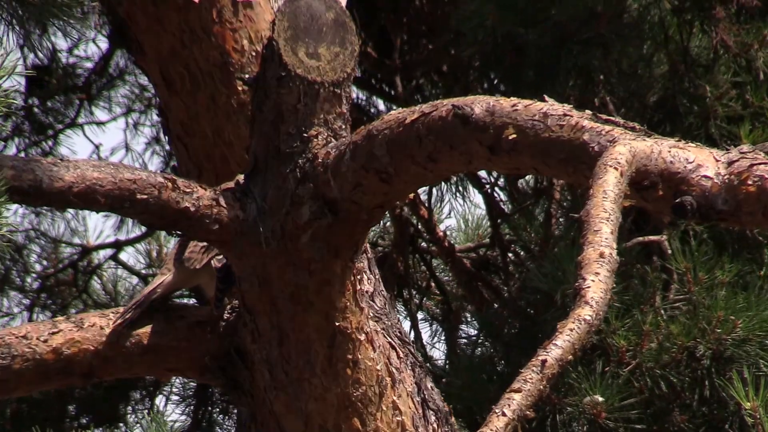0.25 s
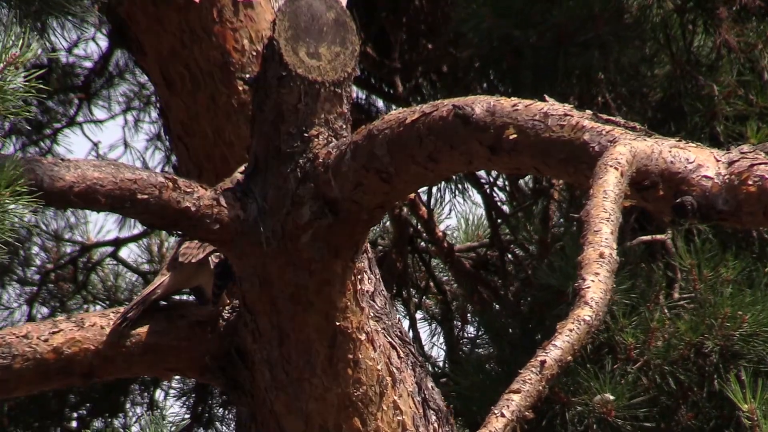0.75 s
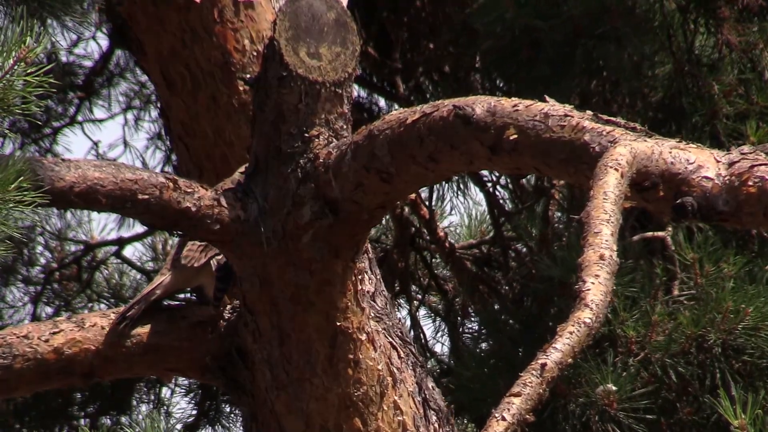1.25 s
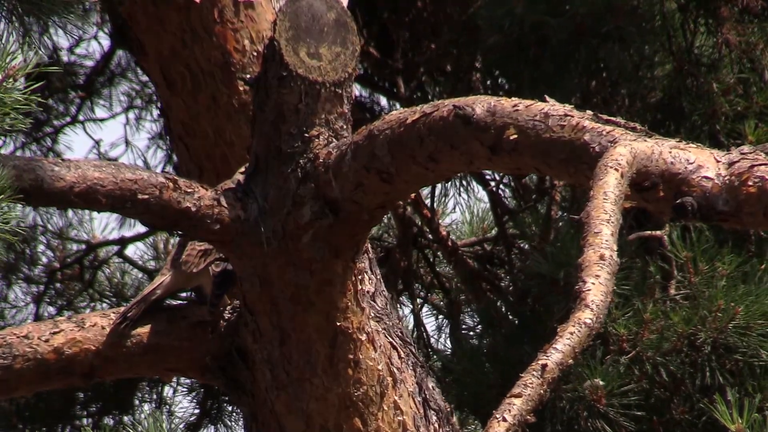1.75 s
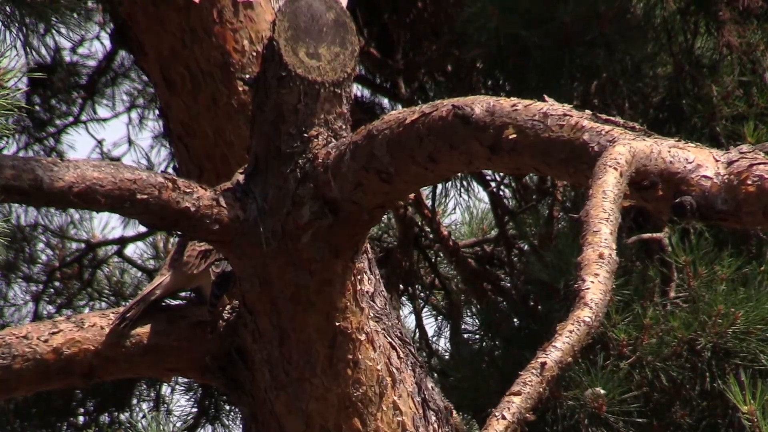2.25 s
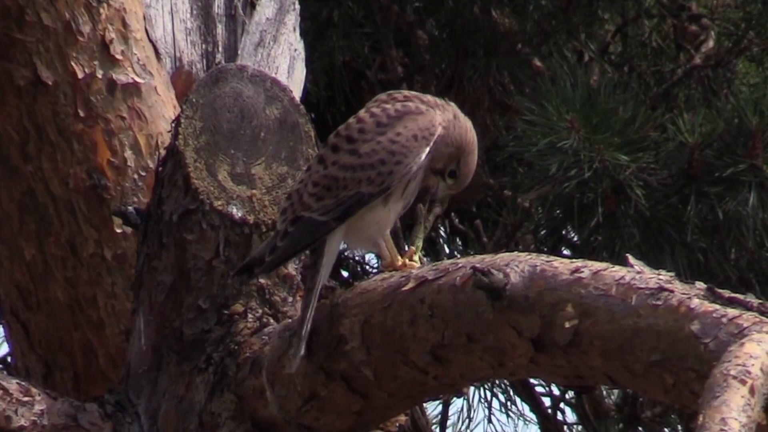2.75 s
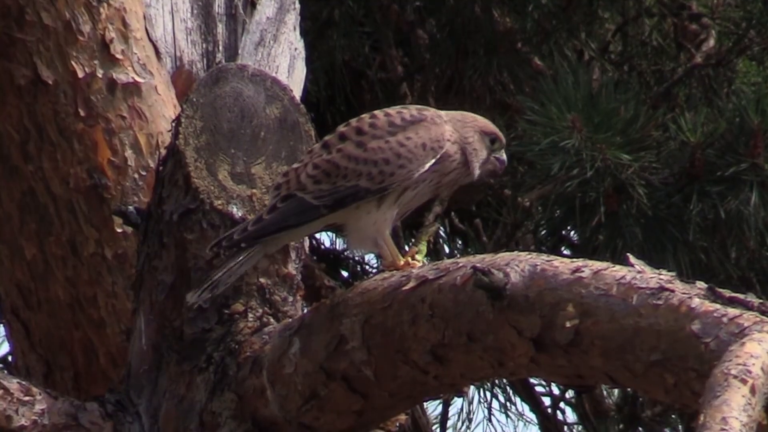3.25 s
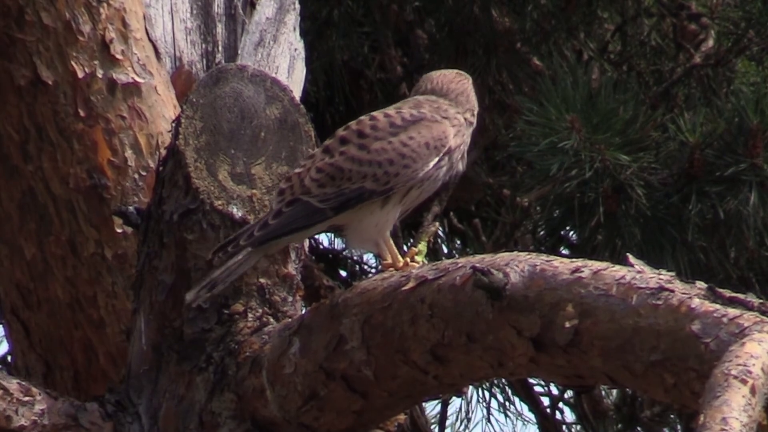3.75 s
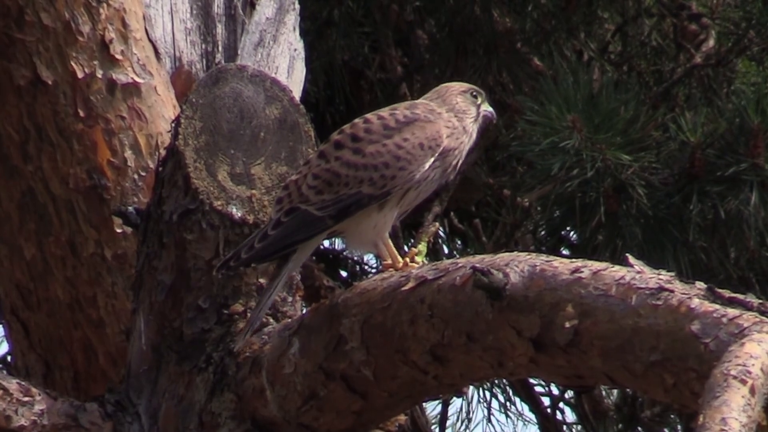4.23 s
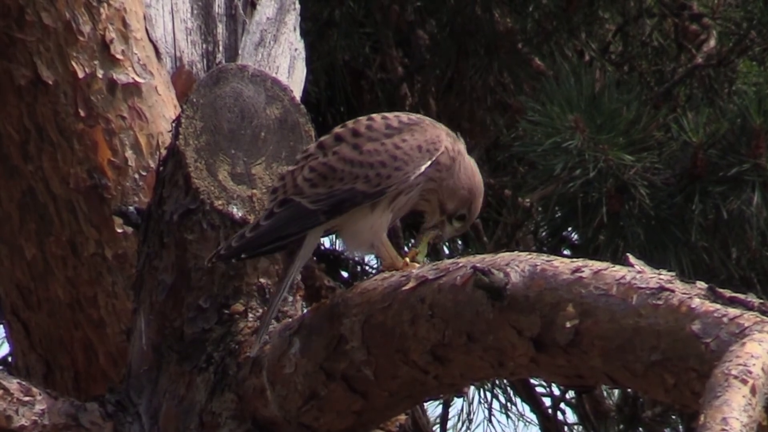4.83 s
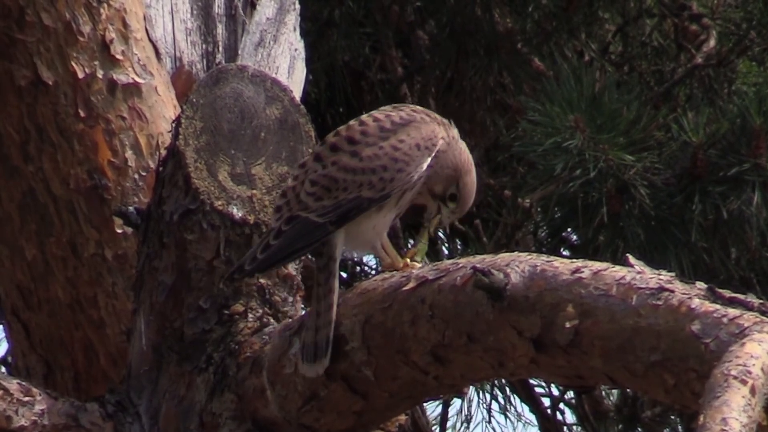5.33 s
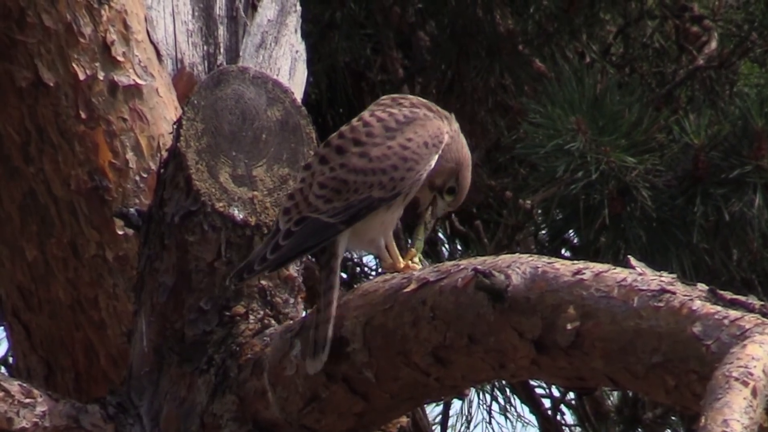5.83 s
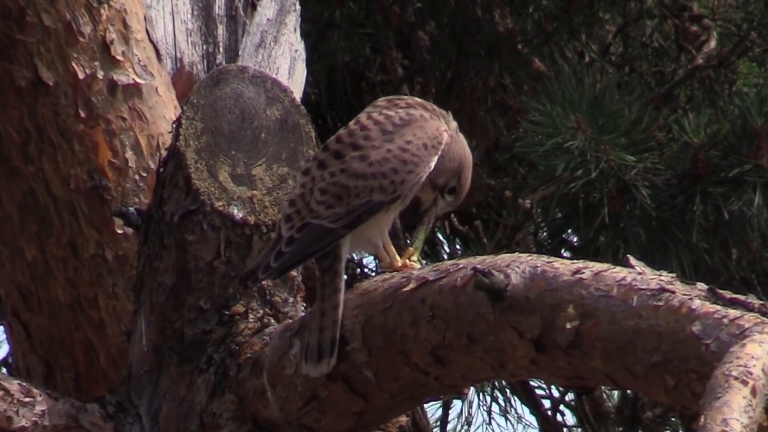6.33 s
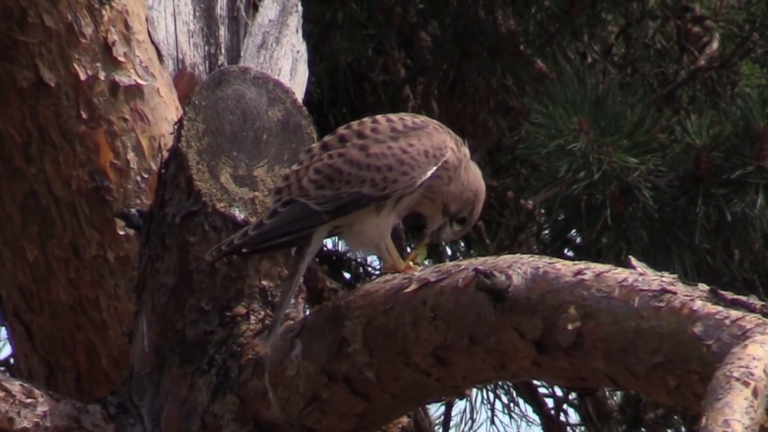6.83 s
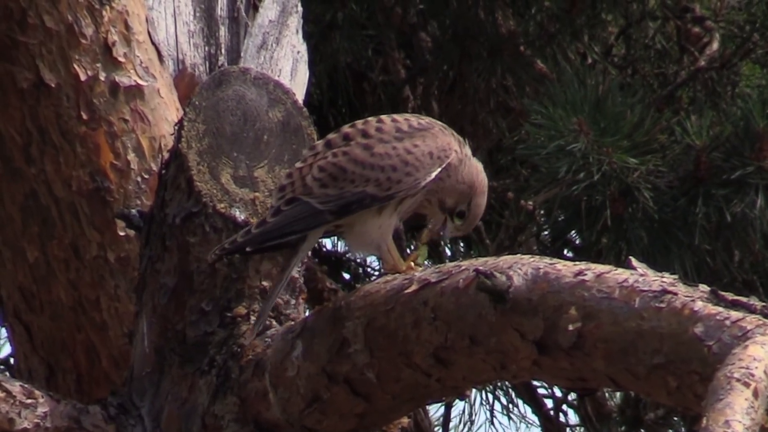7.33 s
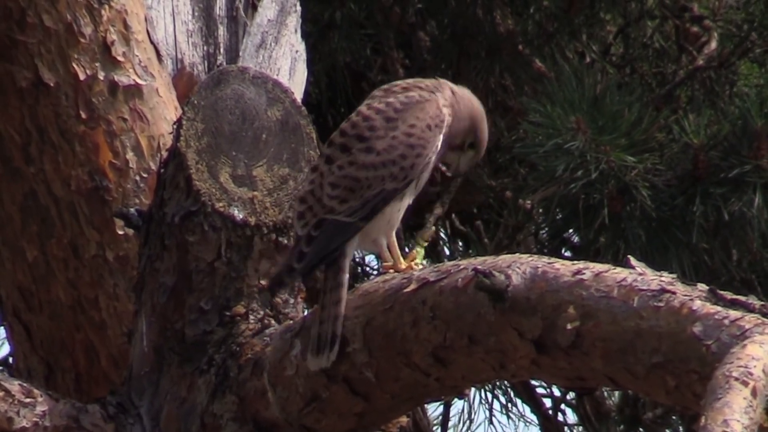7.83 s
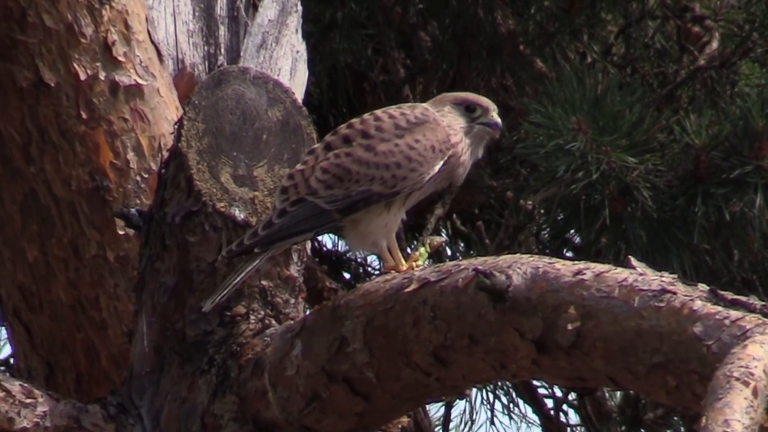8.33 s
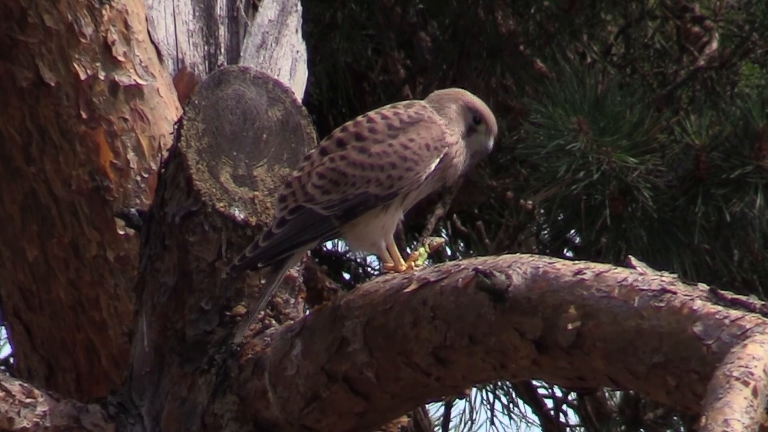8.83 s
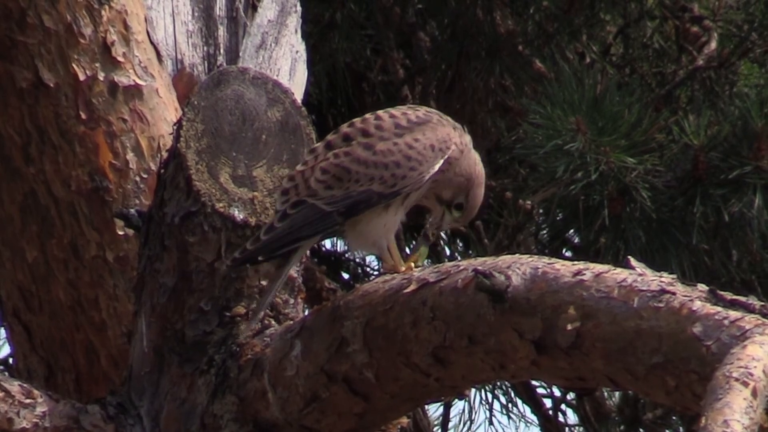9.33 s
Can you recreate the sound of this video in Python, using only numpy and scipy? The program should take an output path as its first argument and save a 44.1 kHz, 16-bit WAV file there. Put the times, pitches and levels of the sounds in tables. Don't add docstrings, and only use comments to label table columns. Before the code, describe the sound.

A quiet daytime pine wood in wide stereo, with short diffuse echoes from trunks. A harsh, rasping double call, shrill and low at once, opens at 0 seconds and repeats near 2.0, 4.2, 6.5 and 8.6, each pair lasting under a fifth of a second. From 0.6 to 2.3 a close small bird sings fast, very high gliding whistles with a brief dry trill. Between verses, distant birds give thin buzzy notes around 2.6 to 3.8 and rising whip-like chirps on the right from 4.0 to 4.6. The near song returns from 6.8 to 9.6, longer, with a second trill around 9.1, while far birds sigh and whistle upward. A sharp beak tick at 0.13 and another at 3.06, with fainter ones scattered, mix with twig snaps on the left near 4.5, 6.1 and 7.9. Soft needle rustle, subsonic wind and a very faint engine hum continue.

```python
import sys
import numpy as np
from scipy import signal
from scipy.io import wavfile
from scipy.ndimage import uniform_filter1d

SR = 44100
rng = np.random.default_rng(int(sys.argv[2]) if len(sys.argv) > 2 else 0)


def int16_out(signal):
    q = np.round(np.clip(np.atleast_2d(signal).T, -1, 1) * 32767)
    wavfile.write(sys.argv[1], SR, q.astype(np.int16))


def linear_from_db(decibels):
    return 10 ** (np.asarray(decibels, float) / 20)


N = 422478

# share_of_length (0-1), pitch_hz, level_db
DROP = [(0, 5150, -4), (.4, 4650, 0), (1, 3680, -8)]
DIP = [(0, 5490, -9), (.43, 4920, 0), (1, 4000, -8)]
RISE = [(0, 5640, -12), (.29, 5955, -1), (.64, 6130, 0), (1, 6620, -11)]
FLAT = [(0, 5110, -16), (.45, 5160, 0), (1, 5190, -5)]
SLIDE = [(0, 8980, -19), (.28, 8010, 0), (.6, 7360, -1.5), (1, 6980, -3)]
HOOK = [(0, 5900, -13), (.2, 7080, -2), (.4, 6650, -1), (.66, 5880, 0), (1, 5250, -6)]
UP = [(0, 6050, -5.5), (.13, 6510, -.5), (.55, 6690, 0), (.79, 7300, -4), (1, 8100, -12)]
OPENER = [(0, 6640, -15), (.13, 6650, 0), (.55, 6830, -2), (.79, 7330, -4), (1, 8170, -13)]
DOWN = [(0, 6200, -13), (.12, 6440, -7), (.26, 6280, -3.5), (.63, 5350, 0), (1, 4340, -12)]
HOLD = [(0, 7000, -30), (.135, 6900, -3), (.27, 6380, -9), (.59, 6430, 0), (1, 6440, -3)]
TIP = [(0, 8070, -9), (.29, 8300, -4), (.62, 7580, -2), (1, 6850, 0)]
FLICK = [(0, 4060, -17), (.48, 4890, 0), (1, 6150, -6)]
# shape, start_s, length_s, pitch_at_loudest_hz, level_db
VERSES = [(DROP, .638, .037, 4620, -47), (RISE, .745, .07, 6190, -29.5), (DROP, .855, .03, 4700, -38),
          (FLAT, .945, .04, 5172, -28), (DIP, 1.005, .035, 4980, -34), (FLAT, 1.105, .03, 5180, -30),
          (DIP, 1.165, .035, 4900, -33), (SLIDE, 1.262, .128, 7980, -29.5),
          (HOOK, 1.527, .06, 5900, -28), (OPENER, 1.762, .081, 6600, -28),
          (DOWN, 1.895, .045, 5300, -27), (UP, 1.975, .08, 6670, -31),
          (DOWN, 2.112, .043, 5250, -28.5), (UP, 2.193, .082, 6620, -32.5),
          (DROP, 6.813, .032, 4550, -44), (RISE, 6.915, .07, 6080, -31.5),
                (DROP, 7.022, .033, 4670, -36), (FLAT, 7.115, .04, 5160, -28),
                (DIP, 7.18, .035, 4890, -33.5), (SLIDE, 7.29, .115, 8040, -29.5),
                (HOOK, 7.538, .062, 5890, -28), (OPENER, 7.765, .082, 6710, -26),
                (DOWN, 7.894, .044, 5390, -27), (UP, 7.978, .082, 6720, -29),
                (DOWN, 8.113, .042, 5390, -27.5), (UP, 8.195, .08, 6690, -31.5),
                (DOWN, 8.328, .05, 5260, -29.5), (UP, 8.41, .083, 6740, -31.5),
                (DOWN, 8.547, .043, 5390, -30), (HOLD, 8.822, .133, 6430, -31),
                (TIP, 9.298, .052, 6850, -36), (FLAT, 9.43, .024, 4410, -43),
                (FLICK, 9.451, .031, 4950, -34), (FLICK, 9.54, .025, 4890, -37)]
# peak_s, peak_db
TRILL_CHIPS = [(1.6224, -45), (1.6543, -36), (1.694, -41), (1.7214, -35), (7.6324, -43), (7.666, -36),
               (7.7004, -40), (7.73, -37), (8.9977, -47), (9.0317, -40), (9.0693, -43), (9.1017, -40.5),
               (9.1396, -43), (9.1726, -41.5), (9.213, -43.5), (9.2444, -40.5), (9.2893, -49)]
# pitch_hz, left_minus_right_db
PITCH_PAN = [(4200, -3), (5200, -7), (6000, 6), (6800, 11), (8000, 12.5)]
# delay_s, level_db
LIMB_ECHOES = [
    [(.0025, -16.5), (.005, -24.5), (.0074, -9.5)],
    [(.0032, -8), (.0042, -7), (.002, -15.5)],
]

# start_s, length_s, level_db, low_membrane_start_hz, high_membrane_hz
HARSH_CALLS = [
    (-.068, 0.044, -39.5, 1125, 3700),
    (0.037, 0.0442, -37.5, 1025, 3715),
    (2.02, 0.038, -36.5, 1117, 3690),
    (2.126, 0.0483, -38.5, 1025, 3690),
    (4.206, 0.044, -39, 1116, 3750),
    (4.322, .055, -39, 1052, 3750),
    (6.492, 0.038, -38.5, 1146, 3790),
    (6.599, .05, -39.5, 1018, 3773),
    (8.579, 0.033, -37.5, 1155, 3810),
    (8.674, 0.057, -41.5, 1043, 3795),
]
MIX_TONES = [(0, 1), (0, 2), (1, -2), (1, -1), (1, 1), (2, -2), (1, 2), (2, -1), (2, 0)]
MIX_TONE_DB = [-1.5, -15, -16, -16, -13, -15, -20, -19, -25]
# centre_hz, width_hz, level_db
THROAT = [
    (1850, 700, -13),
    (3750, 330, -3),
    (5100, 1700, -11.5),
]

# start_s, length_s, start_hz, end_hz, level_db
BUZZER = [(2.62, .045, 7800, 7400, -50.5), (2.66, .1, 7600, 7950, -50), (2.868, .115, 7600, 8020, -49.5),
          (3.685, .03, 7300, 7350, -54), (3.712, .045, 6850, 7000, -48.5), (3.75, .065, 7200, 7780, -49),
          (4.09, .07, 6900, 6750, -57), (4.99, .06, 6800, 7400, -57), (5.045, .045, 7800, 7500, -54),
          (5.465, .1, 6650, 7050, -56)]
PIPER = [(.345, .03, 6500, 7000, -57), (.395, .02, 5860, 6450, -51), (.435, .135, 7550, 6150, -45.5),
         (6.4, .12, 7170, 7000, -62), (6.605, .04, 6750, 6880, -48), (6.645, .085, 6870, 6040, -44),
         (8.37, .04, 6620, 6760, -44)]
WHIPPER = [(4.0, .065, 3780, 5280, -51.5), (4.18, .065, 3800, 5200, -50), (4.37, .06, 3950, 5500, -49),
           (4.545, .08, 3820, 5450, -50.5), (4.895, .04, 5500, 3600, -52)]
SIGHER = [(7.378, .12, 5330, 4250, -51), (7.715, .115, 5250, 4230, -50), (8.095, .108, 5250, 4170, -49)]
LISPING = [(.212, .13, 7600, 8720, -43.5), (.352, .1, 8400, 8720, -44.5), (.75, .07, 7800, 8120, -51)]
ASKING = [(7.555, .088, 3420, 3840, -47), (7.9, .088, 3400, 3870, -46)]
WAVERING = [(3.81, .11, 7330, 7420, -54), (3.92, .07, 7200, 7050, -58), (4.04, .05, 7100, 7050, -61),
            (3.46, .09, 6200, 5250, -56)]
FARTHEST = [(1.44, .04, 3550, 2880, -55), (3.0, .02, 2700, 2690, -50), (3.0, .03, 2150, 2090, -55),
            (3.18, .09, 6350, 6300, -60), (3.38, .08, 6330, 6300, -57), (3.235, .02, 1850, 1830, -56),
            (3.495, .025, 2480, 2420, -54), (3.545, .03, 2000, 2100, -57), (3.58, .08, 4020, 3980, -61),
            (4.68, .06, 8600, 8300, -63), (4.74, .08, 8150, 7650, -58), (5.05, .1, 6430, 6365, -55),
            (5.775, .03, 2000, 2080, -54), (7.465, .025, 3540, 2900, -58)]
# notes, left_minus_right_db, buzz_depth_hz, glide_haste, peak_share (0-1), ends_db
BIRDS = [(BUZZER, 7, 650, 2.2, .4, -3), (WAVERING, 4, 300, 1.1, .25, -5), (LISPING, 5, 190, 6.0, .3, -5),
         (PIPER, 9.5, 0, 3.3, .45, -6), (WHIPPER, -11, 60, 1.05, .6, -8), (SIGHER, -5, 0, 2.6, .4, -4),
         (ASKING, -4, 0, 1.1, .88, -4), (FARTHEST, 1.5, 200, 1.1, .4, -4)]

# start_s, peak_db, centre_hz
BEAK_TICKS = [(0.1274, -24, 7900), (.937, -42, 7000), (1.1093, -41, 8000), (1.19, -44, 7500),
              (1.513, -37, 8500), (3.0597, -30, 8200), (3.231, -41, 8500), (4.829, -42, 8500),
              (4.9986, -39, 9000), (5.0453, -38, 9000), (5.1467, -41, 10000), (5.251, -34, 7500),
              (5.326, -35, 7460), (5.99, -40, 11000), (8.1194, -46, 7000), (8.42, -41, 5500),
              (8.6603, -38, 9500), (8.696, -37, 9500), (8.735, -37, 8500), (9.0794, -42, 8100),
              (9.112, -38, 8500), (9.1444, -45, 8000), (.1106, -41, 11000), (.8355, -44, 12000),
              (1.6247, -45, 11000), (2.0632, -45, 11000), (2.6655, -46, 12000), (3.008, -42, 6300),
              (3.008, -44, 2800), (3.5181, -45, 12000), (3.4985, -44, 2300), (4.4933, -46, 12000),
              (5.5988, -46, 10000), (5.7999, -46, 10000), (5.722, -44, 5500), (.961, -43, 7000),
              (8.6603, -42, 450), (8.697, -40, 900), (9.112, -40, 350), (9.08, -44, 1500)]
# start_s, peak_db, centre_hz
TWIG_TICKS = [(0.7166, -33, 5470), (1.29, -44, 5000), (3.159, -36, 8200), (3.545, -45, 6500),
              (4.5144, -31, 5800), (4.515, -32, 1200), (4.8818, -33, 7600), (6.1467, -30.5, 8000),
              (6.6663, -36, 10000), (7.1444, -40, 5500), (7.5155, -41, 6000), (7.8625, -32, 5500),
              (7.9056, -30.5, 5500), (7.9428, -38, 9000), (7.978, -43, 5000), (6.7477, -48, 11000),
              (7.1323, -45, 11000), (7.5754, -45, 13000), (7.8467, -43, 11000), (7.8801, -43, 13000),
              (8.0747, -47, 11000), (9.1607, -46, 11000), (4.892, -41, 8200), (4.907, -45, 8500)]
# frequency_hz, density_db (per Hz)
RUSTLE_SPECTRUM = [(42, -10), (190, -10.2), (475, 0), (740, -4.5), (1600, -4.3), (2400, -11), (6390, -10.5),
                   (15700, -28)]
# time_s, level_db
BREEZE = [(0, -1), (2, 0), (3.5, 3), (5, 0), (6.8, -3), (8.5, -2), (9.6, 1)]
# peak_s, peak_db
ENGINE_SWELLS = [(3.45, -66.5), (5.17, -75), (8.7, -68.5), (9.6, -67)]


def near_singer():
    out = np.zeros((2, N))
    pan_hz, pan_db = np.transpose(PITCH_PAN)
    syllables = [sung(*row) for row in VERSES] + [chip(*row) for row in TRILL_CHIPS]
    for path in syllables:
        note, pitch = whistle(path, edge_s=.0028, wobble_hz=10, wobble_rate_hz=80, octave_db=-44, onset_s=.009)
        add(out, path[0][0], panned(linear_from_db(2.3) * note, np.interp(pitch, pan_hz, pan_db)))
    heard = wood(out, wet_db=-10.5, build_s=.015, t60=.14, knee=1.7, late_db=-19.5, late_t60=.6,
                 low_cut_hz=680, limbs=LIMB_ECHOES)
    return arrive(heard, -81)


def sung(shape, s, length, hz, db):
    lead_in_s = .0025
    share, shape_hz, shape_db = np.transpose(shape)
    pitch = shape_hz * hz / shape_hz[shape_db.argmax()]
    return np.transpose([s - lead_in_s + length * share, pitch, db + shape_db])


def chip(s, db):
    top_hz, end_hz, length_s = 7900, 4300, .009
    return [(s - length_s / 4, top_hz, db - 6),
            (s + length_s / 4, (top_hz + end_hz) / 2, db),
            (s + length_s * 3 / 4, end_hz, db - 6)]


def whistle(path, edge_s, wobble_hz, wobble_rate_hz, buzz_hz=0, octave_db=-90, onset_s=0):
    s, hz, db = np.transpose(path)
    t = np.arange(s[0], s[-1], 1 / SR)
    size = len(t)
    buzz_rate = 270 * linear_from_db(1.5 * slow(60, size))
    dip = np.sin(np.pi * np.cumsum(buzz_rate) / SR) ** 4 * (buzz_hz > 0)
    pitch = uniform_filter1d(np.interp(t, s, hz), size=size // 12)
    pitch = pitch + wobble_hz * slow(wobble_rate_hz, size) - buzz_hz * dip
    fade_in_s = max(edge_s, min(onset_s, size / SR / 8))
    nearest_end = np.minimum((t - s[0]) / fade_in_s, (s[-1] - t) / edge_s)
    edge = np.sin(np.pi / 2 * np.clip(nearest_end, 0, 1)) ** 2
    phase = 2 * np.pi * np.cumsum(pitch) / SR
    octave = linear_from_db(octave_db + np.interp(t, s, db - db.max())) * np.sin(2 * phase)
    level = np.sqrt(2) * linear_from_db(np.interp(t, s, db) - 8 * dip)
    return level * edge * (np.sin(phase) + octave), pitch


def harsh_caller():
    low_end_hz, shrill_lead_s = 968, .005
    lead = SR // 10
    voice, breath = np.zeros(N + lead), np.full(N + lead, 1e-18)
    for s, length, db, low_hz, high_hz in HARSH_CALLS:
        t = np.arange(0, length + .01, 1 / SR)
        size = len(t)
        u = (t - shrill_lead_s) / length
        high_pitch = high_hz - 120 * (u - .5) + 110 * slow(162, size)
        low_pitch = low_hz + (low_end_hz - low_hz) * u + 35 * slow(212, size)
        high = 2 * np.pi * np.cumsum(high_pitch) / SR
        low = 2 * np.pi * np.cumsum(low_pitch) / SR
        rasp_rate = 250 * linear_from_db(2.5 * slow(50, size))
        rasp = 1 + .38 * np.cos(2 * np.pi * np.cumsum(rasp_rate) / SR)
        effort = np.clip(u / .13, 0, 1) * np.clip((1 - u) / .3, 0, 1) * rasp
        shrill = np.clip(t / .005, 0, 1) * np.clip((t[-1] - t) / .03, 0, 1) * np.sin(high)
        tones = linear_from_db(-2.5 + 3 * slow(110, size)) * shrill
        for (m, n), mix_db in zip(MIX_TONES, MIX_TONE_DB):
            tones += effort * linear_from_db(mix_db + 3.5 * slow(143, size)) * np.sin(m * high + n * low)
        add(voice, s + lead / SR, linear_from_db(db + 4) * tones)
        add(breath, s + lead / SR, linear_from_db(db + 12) * effort * rng.standard_normal(size))
    for hz, width, db in THROAT:
        voice += linear_from_db(db) * resonance(resonance(breath, hz, width), hz, width)
    voice = filtered(voice, 4, 820, "high")
    heard = wood(np.array([voice, voice]), wet_db=-3, t60=.27, late_db=-5.5, late_t60=.9, low_cut_hz=1300)
    return arrive(heard[:, lead:], 17)


def far_singers():
    out = np.zeros((2, N))
    for notes, pan_db, buzz_hz, haste, peak, ends_db in BIRDS:
        for row in notes:
            path = glide(*row, haste, peak, ends_db)
            note, _ = whistle(path, edge_s=.0047, wobble_hz=12 + .05 * buzz_hz, wobble_rate_hz=72,
                              buzz_hz=buzz_hz)
            add(out, row[0], panned(linear_from_db(1.5) * note, pan_db))
    return arrive(wood(out, wet_db=-7.5, t60=.13, late_db=-12, late_t60=.45, low_cut_hz=1500), 44)


def glide(s, length, start_hz, end_hz, db, haste, peak, ends_db):
    u = np.linspace(0, 1, num=12)
    swell = np.interp(u, [0, peak, 1], [ends_db, 0, ends_db])
    pitch = end_hz + (start_hz - end_hz) * (1 - u) ** haste
    return np.transpose([s + length * u, pitch, db + swell])


def ticks():
    out, t = np.zeros((2, N)), np.arange(1200) / SR
    for events, pan_db in [(BEAK_TICKS, .6), (TWIG_TICKS, 7)]:
        for s, db, hz in events:
            envelope = np.clip(t / .0008, 0, 1) * linear_from_db(-60 * t / (.008 + 6 / hz))
            snap = resonance(rng.standard_normal(len(t)) * envelope, hz, .7 * hz)
            add(out, s, panned(linear_from_db(db) * snap / np.abs(snap).max(), pan_db))
    return arrive(out, -43)


def rustle():
    out, white = 0, rng.standard_normal((2, 2, N))
    edges = 36 * 2 ** np.arange(0, 9, 1 / 3)
    hz, db = np.transpose(RUSTLE_SPECTRUM)
    sway = slow(4)
    for k, (low, high) in enumerate(zip(edges, edges[1:])):
        left, right = filtered(white[k % 2], 2, [low, high], "band")
        share = .067 * (high < 2500)
        left = np.sqrt(1 - share) * left + np.sqrt(share) * np.roll(right, 97)
        band_db = np.interp(np.log(low * high) / 2, np.log(hz), db)
        patchy = np.roll(sway, 9973 * k + 5000)
        out = out + np.array([left, right]) * linear_from_db(band_db + .5 * sway + .8 * patchy)
    return linear_from_db(-53.5 + 3) * out / out.std() * linear_from_db(np.array([[.4], [-.4]]))


def wind():
    low = filtered(rng.standard_normal((2, N + SR)), 3, [6, 25], "band")[:, SR:]
    breeze_db = np.interp(np.arange(N) / SR, *np.transpose(BREEZE))
    gust_db = .8 * slow(.4)
    capsule_db = np.array([[2.2], [3.7]])
    return linear_from_db(-54.5 + breeze_db + gust_db + capsule_db) * low / low.std()


def drone():
    t = np.arange(N) / SR
    swell_db = np.max([db - 16 * abs(t - s) for s, db in ENGINE_SWELLS], axis=0)
    level_db = np.maximum(swell_db, -85)
    pitch = 73 + 1.52 * slow(2.43)
    return np.sqrt(2) * linear_from_db(level_db) * np.sin(2 * np.pi * np.cumsum(pitch) / SR)


def wood(x, wet_db, t60, late_db, late_t60, low_cut_hz, limbs=((), ()), knee=1, build_s=.005):
    t = np.arange(SR) / SR
    echoes = rng.standard_normal((2, SR)) * linear_from_db(3 * rng.standard_normal((2, SR))) * np.clip(t / build_s, 0, 1)
    near, far = linear_from_db(-60 * (t / t60) ** knee), linear_from_db(-60 * t / late_t60)
    shape = linear_from_db(wet_db) * near / np.linalg.norm(near) + linear_from_db(late_db) * far / np.linalg.norm(far)
    tail = filtered(echoes / echoes.std() * shape, 4, low_cut_hz, "high")
    source = np.tile(x.mean(axis=0), (2, 1))
    out = x + signal.fftconvolve(source, tail, axes=1)[:, :x.shape[1]]
    for side, taps in enumerate(limbs):
        for delay, db in taps:
            add(out[side], delay, linear_from_db(db) * x[side])
    return out


def arrive(x, left_lag):
    return np.array([np.roll(x[0], max(left_lag, 0)), np.roll(x[1], max(-left_lag, 0))])


def panned(x, pan_db):
    g = linear_from_db(pan_db)
    return x * np.array([g, np.ones_like(g)]).reshape(2, -1) * np.sqrt(2 / (1 + g * g))


def add(out, s, x):
    i = round(s * SR)
    out[..., i:i + x.shape[-1]] += x[..., :out.shape[-1] - i]


def filtered(x, order, hz, kind):
    return signal.sosfilt(signal.butter(order, hz, kind, fs=SR, output="sos"), x)


def resonance(x, hz, width_hz):
    r = np.exp(-np.pi * width_hz / SR)
    poles = [1, -2 * r * np.cos(2 * np.pi * hz / SR), r * r]
    return signal.lfilter([(1 - r * r) / 2, 0, (r * r - 1) / 2], poles, x)


def slow(rate_hz, size=N):
    r = np.exp(-2 * np.pi * rate_hz / SR)
    x = signal.lfilter([1], [1, -2 * r, r * r], rng.standard_normal(size + 4000))[4000:]
    return x / x.std()


def scene():
    birds = near_singer() + harsh_caller() + far_singers()
    return birds + ticks() + rustle() + wind() + drone()


def band_limit(x):
    return signal.sosfilt(signal.butter(12, 16650, fs=SR, output="sos"), x)


def record(dry):
    top_cut = signal.cheby2(16, 45, 16400, fs=SR, output="sos")
    mix = signal.sosfilt(top_cut, dry)
    return band_limit(mix)


dry = scene()
out = record(dry)
int16_out(out)
```